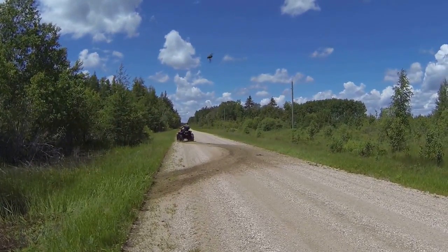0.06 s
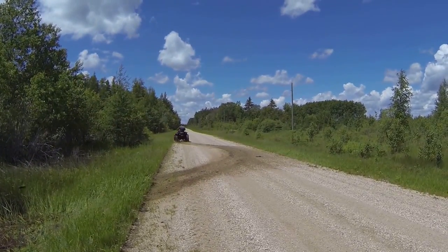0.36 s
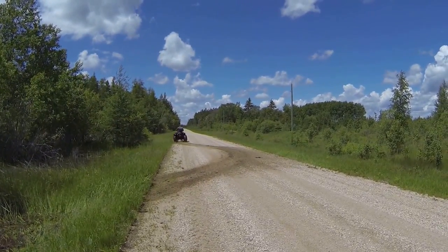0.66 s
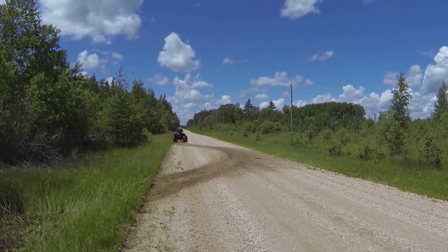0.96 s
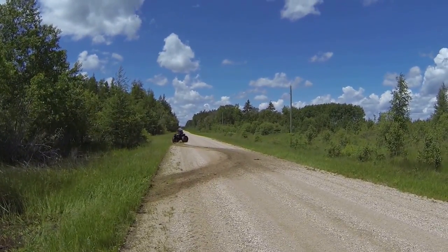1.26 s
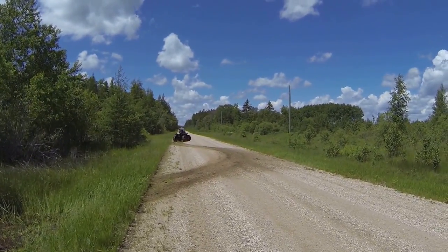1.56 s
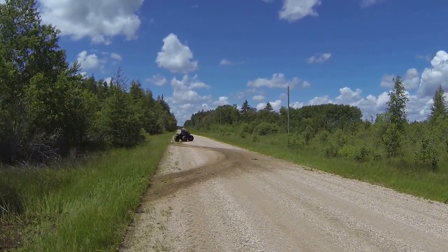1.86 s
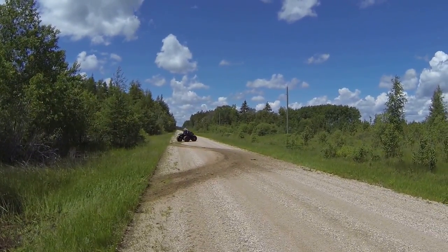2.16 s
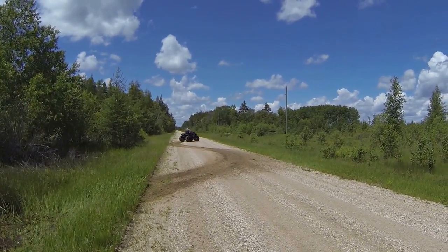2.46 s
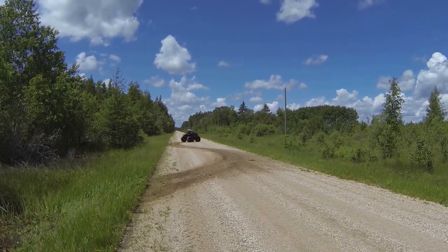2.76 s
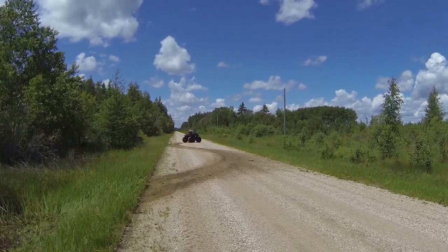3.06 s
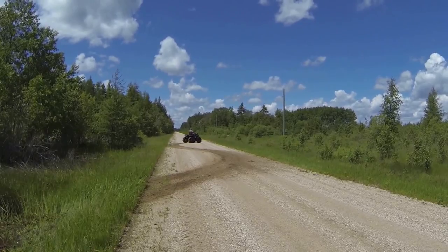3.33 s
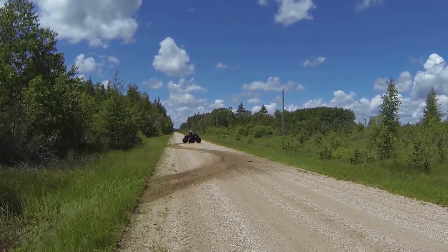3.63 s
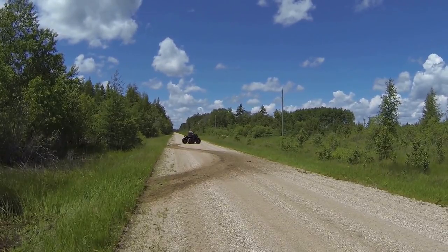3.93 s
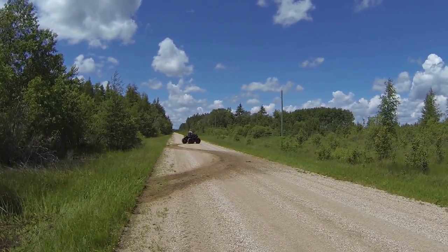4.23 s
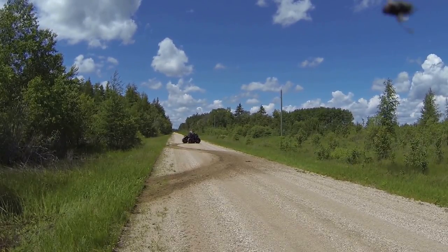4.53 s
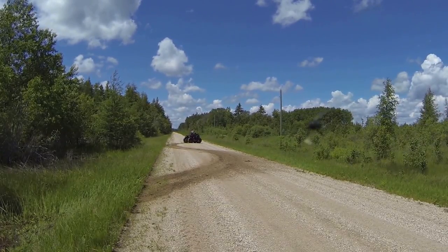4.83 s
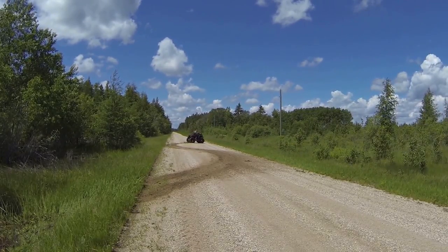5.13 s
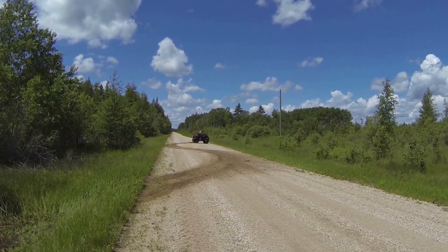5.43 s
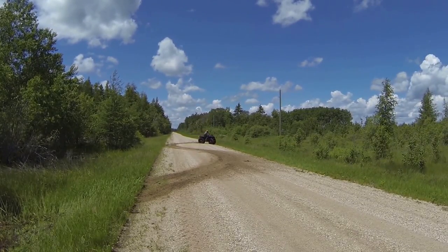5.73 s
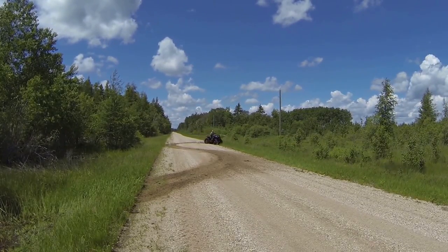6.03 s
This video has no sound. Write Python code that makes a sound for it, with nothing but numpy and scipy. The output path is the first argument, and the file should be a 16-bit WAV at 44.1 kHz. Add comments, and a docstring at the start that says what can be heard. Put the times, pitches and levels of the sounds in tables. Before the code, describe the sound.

Close by, a quad bike engine drones through churning water with little hisses of steam, then blips and drops towards idle. A wet brake squeals briefly and the water surges and gurgles. Sharp knocks, thuds and crackling scrapes hit close to the microphone as wind starts to buffet it. A bird chirps faintly, and the quad pulls away in a string of short, rising revs.

```python
"""A swamp, then a gravel road: close by, a V-twin quad bike wades, blips its throttle and drops to idle,
then pulls away in short, rising revs. Firing pulses ring its air box and tailpipe over a muffler drone.
The wheels churn water, which hisses on the hot exhaust; a wet brake groans and sharp knocks ring out.
Short crackling, scraping bursts and thuds come close to the microphone; wind buffets it; a bird chirps."""
import sys
import numpy as np
from scipy import signal
from scipy.fft import rfft, irfft, next_fast_len
from scipy.io import wavfile
from scipy.ndimage import uniform_filter1d

SR = 44100
rng = np.random.default_rng(int(sys.argv[2]) if len(sys.argv) > 2 else 0)


def persist_wave(psi):
    """Save psi, clipped to +-1, as 16-bit WAV."""
    counts = np.round(np.clip(psi, -1, 1) * 32767).astype(np.int16)
    wavfile.write(sys.argv[1], SR, np.atleast_2d(counts).T)


N = 268569
TIME = np.arange(N) / SR


def from_db(db):
    """Decibels to gain."""
    return 10 ** (np.asarray(db) / 20)


def rms_one(x):
    """Scale to rms 1."""
    return x / np.sqrt(np.mean(x ** 2) + 1e-20)


def drift(knots_per_s):
    """Random wander, rms 1."""
    knots = rng.standard_normal(N // 10)
    return rms_one(np.interp(TIME * knots_per_s, np.arange(len(knots)), knots))


def gate(start, end, edge_s):
    """1 between two times, with linear edges."""
    return np.clip(np.minimum(TIME - start, end - TIME) / edge_s + .5, 0, 1)


def lowpass(x, hz, order):
    """Butterworth low-pass."""
    return signal.sosfilt(signal.butter(order, hz, fs=SR, output="sos"), x)


def colour(x, spectrum):
    """Minimum-phase filter of unit power; spectrum rows are f/Hz, relative level/dB."""
    size = next_fast_len(N + SR // 2)
    hz, db = np.transpose(spectrum)
    gain = from_db(np.interp(np.log(np.fft.rfftfreq(size, 1 / SR) + 1), np.log(hz), db))
    cepstrum = irfft(np.log(rms_one(gain)), size)
    cepstrum[1:size // 2] *= 2
    cepstrum[size // 2 + 1:] = 0
    return irfft(rfft(x, size) * np.exp(rfft(cepstrum)), size)[:N]


def resonate(x, hz, *widths_hz):
    """Resonators in series, one per width; peak gain 1."""
    for width_hz in widths_hz:
        r = np.exp(-np.pi * width_hz / SR)
        feedback = [1, -2 * r * np.cos(2 * np.pi * hz / SR), r * r]
        x = signal.lfilter(np.array([1, 0, -1]) * (1 - r * r) / 2, feedback, x + 1e-18)
    return x


def ring(clicks, hz, t60_s):
    """A unit click starts a decaying sine of height 1."""
    r, w = from_db(-60 / (t60_s * SR)), 2 * np.pi * hz / SR
    return signal.lfilter([0, np.sin(w)], [1, -2 * r * np.cos(w), r * r], clicks + 1e-18)


def clicks_at(times_s, db):
    """Single-sample clicks."""
    samples = np.round(np.asarray(times_s) * SR).astype(int)
    return np.bincount(np.clip(samples, 0, N - 1), from_db(db), N)


def grains(per_s, spread_db):
    """Random impulses of uneven size, rms 1."""
    sizes = from_db(spread_db * np.minimum(rng.exponential(1, N), 4)) * rng.choice([-1, 1], N)
    return rms_one(sizes * (rng.random(N) < per_s / SR))


def murmur(start, end, first_hz, last_hz, width_hz):
    """Narrow noise band with a gliding centre."""
    phase = 2 * np.pi * np.cumsum(np.interp(TIME, [start, end], [first_hz, last_hz])) / SR
    return drift(width_hz) * np.cos(phase) + drift(width_hz) * np.sin(phase)


def levelled(x, low_hz, high_hz):
    """Scale so that one band holds a running rms of 1."""
    band = signal.sosfilt(signal.butter(2, [low_hz, high_hz], "band", fs=SR, output="sos"), x)
    return x / np.sqrt(uniform_filter1d(band ** 2, SR // 8) + 1e-12)


def blurred(x, echoes_s):
    """Short all-pass reflections spread a pulse in time and keep its colour."""
    for delay_s in echoes_s:
        taps = np.r_[.4, np.zeros(int(delay_s * SR)), 1]
        x = signal.lfilter(taps, taps[::-1], x)
    return x


# Still air spectrum: f/Hz, relative level/dB
AIR_SPECTRUM = [(200, -18), (3000, -3), (5000, -15), (15000, -29)]


def still_air():
    """A faint, steady background hiss."""
    return from_db(-62) * colour(rng.standard_normal(N), AIR_SPECTRUM)


IDLE_HZ, WADING_HZ, CRUISE_HZ = 19.5, 35.1, 40.9  # four-stroke cycles per second
# Throttle blips: open t/s, close t/s, attack/s, target speed/Hz, relative bark/dB, sharpness/dB,
# overrun level/dB
BLIPS = [(1.127, 1.213, 0.0073, 32.8, -32, 4.5, -40), (1.69, 1.84, .05, 30.5, -39, 0, -45),
         (4.071, 4.179, 0.013, 26, -42.5, 1, -51), (4.328, 4.433, 0.012, 27.93, -42, -4, -49),
         (4.595, 4.728, 0.025, 33.5, -35.5, -4, -39), (4.88, 5.128, .08, 41.9, -31.5, 0, -37.5),
         (5.272, 5.44, 0.059, 44.5, -31, 8, -36), (5.583, 5.735, 0.036, 46.2, -32.5, 7, -33.5),
         (5.937, 6.093, 0.025, 43, -43, -4, -41)]


def throttle(shut_s=.022):
    """Throttle opening, 0-1; one row per blip."""
    return np.array([np.clip(np.minimum((TIME - opens) / attack_s, (closes - TIME) / shut_s + .5), 0, 1)
                     for opens, closes, attack_s, *_ in BLIPS])


def engine_speed(ease_s=1.45, coast_s=.81, flywheel_s=.034):
    """Cycle rate in Hz: eases off in the water, climbs at each blip, sags towards idle."""
    speed_hz = IDLE_HZ + (WADING_HZ - IDLE_HZ) * np.exp(-TIME / ease_s)
    for opens, closes, _, top_hz, *_ in BLIPS:
        climb_hz = np.interp(TIME, [opens, closes], [np.interp(opens, TIME, speed_hz), top_hz])
        sag = np.exp(-np.maximum(TIME - closes, 0) / coast_s)
        speed_hz = np.where(TIME < opens, speed_hz, np.maximum(climb_hz * sag, IDLE_HZ))
    return uniform_filter1d(speed_hz, int(flywheel_s * SR) + 1)


def firings(cycle, second_db, scatter_db, lag_cycles=.615):
    """Two unevenly spaced pulses a cycle, the second cylinder weaker."""
    pulses = np.zeros(N)
    for offset, db in ((0, 0), (lag_cycles, second_db)):
        at = np.flatnonzero(np.diff(np.floor(cycle - offset)))
        pulses[at] += from_db(db + scatter_db * rng.standard_normal(N)[:len(at)])
    return pulses


def drone(cycle, orders, waver_db, smear_rad):
    """Wavering partials of the cycle rate, the higher ones arriving later; rms 1."""
    return rms_one(sum(
        -from_db(db + waver_db * drift(14)) * np.cos(2 * np.pi * k * cycle - smear_rad * k * k)
        for k, db in orders))


# Exhaust partials: multiple of the cycle rate, relative level/dB
SWAMP_ORDERS = [(2, -2.5), (3, 4.5), (4, 1), (5, -3), (6, -1), (7, -13), (9, -8.5), (10, -17), (12, -13),
                (15, -15), (16, -16)]
ROAD_ORDERS = [(2, -1), (3, 2.5), (4, 1), (5, 4), (6, -11), (8, -11)]


def muffler(cycle, speed_hz, wading):
    """The muffler leaves clean low partials that build above idle and swell on an open throttle."""
    swamp = from_db(-30.5 + 3 * wading) * drone(cycle, SWAMP_ORDERS, waver_db=.8, smear_rad=.5)
    road = from_db(-36) * speed_hz / CRUISE_HZ * drone(cycle, ROAD_ORDERS, waver_db=3, smear_rad=.55)
    on_road = np.interp(TIME, [2.4, 3.4], [0, 1])
    effort = np.tanh((speed_hz - IDLE_HZ + .5) / 11) * (1 + .4 * throttle().sum(axis=0))
    return effort * ((1 - on_road) * swamp + on_road * road)


# Air box modes: f/Hz, width/Hz, relative level/dB
AIRBOX_MODES = [(168, 44, 7), (340, 60, 6), (495, 45, 8.5), (605, 40, 10.5), (775, 25, 0), (1090, 45, 4),
                (1455, 40, 6.5), (1595, 32, 8), (1890, 50, -5), (3150, 160, -14)]


def intake(speed_hz, pulses, flare):
    """Pulses ring the air box; each blip sets its own loudness and sharpness. Returns sound and load."""
    opening = throttle()
    *_, bark_db, sharp_db, _ = np.transpose(BLIPS)
    putter = from_db(-41.5 + 23.5 * np.log2(speed_hz / CRUISE_HZ))
    gain = putter + from_db(bark_db) @ opening
    sharpness = from_db(sharp_db @ opening)
    labouring = opening.sum(axis=0) * np.clip((38 - speed_hz) / 12, 0, 1)
    turbulence = (.01 + .06 * labouring) * flare * rng.standard_normal(N)
    gas = turbulence - pulses
    low = sum(from_db(db) * resonate(gas, hz, width) for hz, width, db in AIRBOX_MODES[:5])
    high = sum(from_db(db) * resonate(gas, hz, width, 5 * width) for hz, width, db in AIRBOX_MODES[5:])
    bark = lowpass(lowpass(low, 1500, order=1) + sharpness * high, 3600, order=8)
    bark = blurred(bark, echoes_s=(.0007, .0013))  # off the frame
    return .75 * gain * levelled(bark, 450, 1200), gain * sharpness


# Mechanical noise spectrum: f/Hz, relative level/dB
RASP_SPECTRUM = [(80, -59), (300, -10), (550, 4), (750, -16), (1090, -4), (1280, -12.5), (1560, 3),
                 (1900, -5), (2200, -8), (3200, -9.5), (3800, -25), (5100, -30.5), (6300, -48), (8500, -38),
                 (15000, -90)]


def rasp(speed_hz, wading, flare, load):
    """Mechanical noise flares at each firing and grows with speed and load."""
    noise = colour((.38 + flare) * grains(per_s=9000, spread_db=2.5), RASP_SPECTRUM)
    running_db = -41 + 18 * np.log2(speed_hz / CRUISE_HZ) + 3.5 * wading
    return np.hypot(from_db(running_db), .075 * load) * levelled(noise, 1400, 3500)


# Exhaust buzz spectrum: f/Hz, relative level/dB
BUZZ_SPECTRUM = [(220, -10), (300, 7), (360, 2), (440, 9), (550, 9), (660, -5), (770, 1), (820, -7),
                 (880, 2), (970, -4), (1100, 7), (1280, -16), (1800, 1), (4000, -45)]
# Tailpipe modes: f/Hz, width/Hz, relative level/dB
PIPE_MODES = [(183, 50, 2.5), (497, 42, -4), (568.6, 41, -8), (1110, 15, -42), (1726, 14, -26)]


def tailpipe(cycle, overrun_s=.36, fade_db_per_s=13):
    """Overtones of the exhaust beat: a buzz under load in the water, a hollow drone after each blip."""
    beats = firings(cycle, second_db=-6, scatter_db=.5)
    beats = blurred(beats, echoes_s=(.0019, .0031))  # muffler chambers
    buzz = from_db(-37 - fade_db_per_s * TIME) * levelled(colour(beats, BUZZ_SPECTRUM), 300, 1300)
    hollow = sum(from_db(db) * resonate(beats, hz, width, 4 * width) for hz, width, db in PIPE_MODES)
    overrun = np.zeros(N)
    for _, closes, *_, db in BLIPS:
        fade_db = fade_db_per_s * np.maximum(TIME - closes, 0)
        overrun += from_db(db - fade_db) * gate(closes, closes + overrun_s, edge_s=.069)
    return buzz + overrun * levelled(hollow, 140, 700)


def engine():
    """One crank times exhaust, intake and mechanical noise; deep water loads it for the first second."""
    speed_hz = engine_speed()
    cycle = np.cumsum(speed_hz * (1 + .002 * drift(25))) / SR
    wading = gate(-1, 1, edge_s=.045)
    exhaust = muffler(cycle, speed_hz, wading)
    pulses = firings(cycle, second_db=-2, scatter_db=1)
    flare = signal.lfilter([1], [1, -np.exp(-1 / (.006 * SR))], pulses)  # 6 ms tail per firing
    bark, load = intake(speed_hz, pulses, flare)
    mechanics = rasp(speed_hz, wading, flare, load)
    return exhaust + bark + mechanics + tailpipe(cycle) + clatter(speed_hz, flare)


# Churned water spectrum: f/Hz, relative level/dB
WASH_SPECTRUM = [(100, -36), (300, 2.5), (700, 6.5), (900, 4.5), (1150, 4), (1800, 13.5), (2300, 3.5),
                 (3700, -2), (4400, -8.5), (5500, -14), (6300, -24.5), (7500, -28), (15000, -46)]
# Wheels biting into the water: start t/s, end t/s, level/dB
SURGES = [(1.753, 2.062, -34), (2.021, 2.072, -27.5)]


def wheel_wash(fade_db_per_s=8):
    """The wheels churn up fine drops: a dull, fading wake and brighter surges over a deep slosh."""
    wash = colour(grains(per_s=12000, spread_db=2.5), WASH_SPECTRUM)
    wake = from_db(-38 - fade_db_per_s * TIME) * lowpass(wash, 3080, order=4)
    bite = sum(from_db(db) * gate(start, end, edge_s=.079) for start, end, db in SURGES)
    surge = bite * from_db(1.5 * drift(130)) * wash
    slosh = rms_one(resonate(rng.standard_normal(N), 58, 55, 55))
    return wake + surge + from_db(-40) * gate(-1, 2.25, edge_s=.088) * slosh


# Steam bursts: start t/s, end t/s, level/dB
HISSES = [(0, 0.95, -63), (0.13, 0.17, -49.5), (0.337, 0.38, -53), (0.464, 0.504, -54), (0.956, 1.06, -50)]
# Steam spectrum: f/Hz, relative level/dB
STEAM_SPECTRUM = [(1000, -13), (2800, 7), (3800, 12.5), (4400, 0), (5200, 3.5), (6300, -21), (7500, -6.5),
                  (8500, -26), (15000, -32)]


def steam():
    """Water hisses on the hot exhaust."""
    envelope = sum(from_db(db) * gate(start, end, edge_s=.0062) for start, end, db in HISSES)
    return envelope * colour(rng.standard_normal(N), STEAM_SPECTRUM)


# Wind rumble spectrum: f/Hz, relative level/dB
WIND_SPECTRUM = [(10, -30.5), (20, 4.5), (30, -1), (40, -6.5), (55, -14.5), (80, -20.5), (130, -40),
                 (250, -44), (600, -93), (15000, -130)]


def wind(onset_s=2.15, rise_s=.075, fade_db_per_s=2):
    """Wind buffets the microphone: light air, then a sudden gusty blow that slowly slackens."""
    since_s = TIME - onset_s
    blow = from_db(-39) + np.clip(since_s / rise_s, 0, 1) * from_db(-19 - fade_db_per_s * since_s)
    rumble = levelled(colour(rng.standard_normal(N), WIND_SPECTRUM), 12, 120)
    flutter = from_db(-24.5 + 4.4 * drift(18))
    eddies = flutter * rms_one(resonate(rng.standard_normal(N), 108, 100, 100))
    gusts = from_db(2.5 * drift(11))
    return blow * gusts * (rumble + eddies)


# Brake squeals: start t/s, end t/s, first f/Hz, last f/Hz, level/dB
SQUEALS = [(0.846, 0.925, 1830, 1774, -43.5), (0.94, 0.993, 1695, 1800, -36),
           (1.023, 1.098, 1710, 1646, -42.5), (1.327, 1.398, 1528, 1570, -51),
           (2.067, 2.204, 1750, 1686, -40), (2.238, 2.252, 1700, 1690, -29.5),
           (2.474, 2.559, 1620, 1630, -33.5), (2.597, 2.64, 1605, 1626, -29.5),
           (2.671, 2.72, 1600, 1510, -34)]


def brake():
    """A wet brake groans in short, unsteady squeals, each gliding a little."""
    return sum(from_db(db) * gate(start, end, edge_s=.03) * murmur(start, end, *glide_hz, width_hz=380)
               for start, end, *glide_hz, db in SQUEALS)


# Drive train spectrum: f/Hz, relative level/dB
CLATTER_SPECTRUM = [(900, -42), (1700, 4), (3200, 4.5), (4100, 1.5), (4800, -17), (15000, -28)]


def clatter(speed_hz, flare, below_hz=43.4):
    """The loose drive train clatters at each firing when the throttle opens at low revs."""
    lugging = throttle().sum(axis=0) * np.clip((below_hz - speed_hz) / 10, 0, 1)
    return from_db(-42) * lugging * colour(flare * rng.standard_normal(N), CLATTER_SPECTRUM)


# Sharp knocks: t/s, level/dB
KNOCKS = [(1.133, -14.5), (1.148, -11.5), (1.564, -30), (1.688, -30), (2.135, -20), (2.161, -21),
          (2.195, -12.5), (2.382, -15), (2.509, -20), (2.752, -30), (2.818, -13), (2.955, -11),
          (3.058, -28), (3.23, -29.5), (3.858, -33), (3.98, -14), (4.295, -30)]
# Modes they ring: f/Hz, relative level/dB, t60/s
KNOCK_MODES = [(446, -16, 0.059), (722, -20, 0.051), (1096, -18, 0.042), (1414, -6.5, 0.027),
               (1590, -6.5, 0.024), (1900, -2.5, 0.025), (2010, 4.5, 0.0019), (2485, -8.5, 0.015),
               (3030, -8, 0.0038)]


def knocks():
    """Sharp knocks ring one set of modes; the first two are hard engine firings as the throttle opens."""
    times_s, db = np.transpose(KNOCKS)
    ringing = np.zeros(N)
    for k, (hz, mode_db, t60_s) in enumerate(KNOCK_MODES):
        strikes = clicks_at(times_s, db + mode_db + rng.normal(0, 1, len(db)))
        ringing += (-1) ** k * ring(strikes, hz, t60_s)
    return lowpass(ringing, 3000, order=4)


# Spectrum of patter and grit ticks: f/Hz, relative level/dB
TICK_SPECTRUM = [(1000, 4.5), (3000, 8.5), (5200, -1), (6800, -10.5), (8800, -2.5), (10000, -18),
                 (11500, -8), (15000, -28)]


def patter():
    """Light spray patters in faint, dense ticks."""
    drops = gate(1.7, 3.65, edge_s=.02) * grains(per_s=2500, spread_db=5)
    return from_db(-58.5) * colour(drops, TICK_SPECTRUM)


# Gurgles: start t/s, end t/s, first f/Hz, last f/Hz, width/Hz, level/dB
GURGLES = [(1.715, 1.845, 150, 185, 110, -35.5), (1.75, 1.87, 490, 570, 170, -36),
           (1.86, 2.06, 600, 680, 400, -38), (2.005, 2.06, 560, 640, 380, -30)]


def gurgles():
    """Hollows in the churned water resonate with rising pitch."""
    return sum(from_db(db) * gate(start, end, edge_s=.026) * murmur(start, end, *band_hz)
               for start, end, *band_hz, db in GURGLES)


# Close bursts: start t/s, end t/s, thud level/dB, crackle level/dB, drop from middle to ends/dB
BURSTS = [(2.036, 2.116, -24, -40, 8), (2.122, 2.173, -24, -48, 6), (2.19, 2.208, -21.5, -53, 8),
          (2.248, 2.31, -32.5, -51, 8), (2.345, 2.469, -19, -38, 10), (2.478, 2.541, -37, -44, 8),
          (2.592, 2.694, -31.5, -58, 8), (2.812, 2.9, -21.5, -26, 3), (2.92, 2.995, -17.5, -19.5, 11),
          (2.985, 3.025, -25, -35, 5), (3.461, 3.53, -39, -49.5, 8), (3.581, 3.64, -39.5, -50.5, 8),
          (4.936, 5.014, -40, -45, 8), (5.33, 5.455, -40, -39, 7), (5.93, 5.998, -59, -46, 8)]
# Thud and crackle spectra: f/Hz, relative level/dB
THUD_SPECTRUM = [(70, 13.5), (200, 10), (480, -1), (900, -5.5), (1300, -6.5), (1680, 7), (2150, -2.5),
                 (2900, -4.5), (3600, -19), (5300, -19.5), (6600, -26.5), (8600, -20), (10000, -31),
                 (15000, -34)]
CRACKLE_SPECTRUM = [(400, 16.5), (1200, 4.5), (1700, 8), (3000, 17.5), (4000, 6), (5400, 5), (6800, -6.5),
                    (8700, -0.5), (10000, -11), (15000, -17)]


def close_bursts():
    """Short crackling, scraping bursts and thuds close to the microphone; each swells and ebbs."""
    envelopes = []
    for start, end, *_, drop_db in BURSTS:
        arch = from_db(-drop_db * np.interp(TIME, [start, end], [-1, 1]) ** 2)
        envelopes.append(gate(start, end, edge_s=.023) * arch)
    _, _, thud_db, crackle_db, _ = np.transpose(BURSTS)
    roughness = from_db(2 * drift(160))
    thuds = (from_db(thud_db) @ envelopes) * roughness * grains(per_s=12000, spread_db=2)
    crackle = (from_db(crackle_db) @ envelopes) * roughness * grains(per_s=4900, spread_db=5.5)
    return colour(thuds, THUD_SPECTRUM) + colour(crackle, CRACKLE_SPECTRUM)


# Microphone jolts: t/s, level/dB, f/Hz, t60/s
JOLTS = [(2.046, -1.5, 33.3, 0.41), (2.193, 2, 29, 0.11), (2.82, 1, 27, 0.042), (4.957, -7, 32.5, 0.16),
         (5.329, -10, 43, 0.11)]


def jolts():
    """Each jolt shakes the microphone into a deep, dying wobble."""
    return -sum(ring(clicks_at([at_s], [db]), hz, t60_s) for at_s, db, hz, t60_s in JOLTS)


# Grit strikes: t/s, level/dB
GRIT = [(2.136, -14), (2.631, -14), (2.818, -4), (3.06, -24), (3.077, -27), (3.144, -20), (3.17, -25),
        (3.272, -29), (3.328, -27), (3.377, -26), (3.517, -18), (3.613, -22), (3.635, -25), (3.718, -23),
        (4.978, -17), (5.004, -12), (5.392, -9), (5.423, -8), (5.435, -14), (5.704, -17)]


def grit():
    """Grit strikes close by in single ticks."""
    return colour(clicks_at(*np.transpose(GRIT)), TICK_SPECTRUM)


# Bird phrases: level/dB, [(t/s, f/Hz), ...]
PHRASES = [(-61, [(3.17, 2950), (3.22, 3600), (3.28, 3300)]), (-60, [(3.828, 3300), (3.853, 2650)]),
           (-54, [(3.888, 3750), (3.922, 2450), (3.941, 2950), (3.952, 2350), (3.978, 2200)]),
           (-52, [(4.02, 3250), (4.032, 3150), (4.049, 2320), (4.081, 3350), (4.102, 2400)])]


def bird():
    """Faint, wavering whistles swoop up and down."""
    song = np.zeros(N)
    for db, points in PHRASES:
        times_s, hz = np.transpose(points)
        contour_hz = uniform_filter1d(np.interp(TIME, times_s, hz), SR // 150)
        pitch_hz = contour_hz * (1 + .035 * drift(700))
        envelope = from_db(db + 2 * drift(70)) * gate(times_s[0], times_s[-1], edge_s=.02)
        song += envelope * np.sin(2 * np.pi * np.cumsum(pitch_hz) / SR)
    return song


def scene():
    """All sources at one microphone."""
    mix = still_air() + engine()
    mix += wheel_wash() + steam() + gurgles() + patter()
    mix += close_bursts() + knocks() + grit() + brake()
    mix += bird() + wind() + jolts()
    return mix[None]


def record(dry):
    """Clip at full scale, then low-pass at 15.2 kHz."""
    return signal.sosfilt(signal.ellip(10, .1, 90, 15200, fs=SR, output="sos"), np.clip(dry, -1, 1))


dry = scene()
out = record(dry)
persist_wave(out)
```